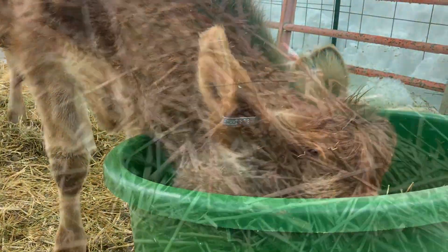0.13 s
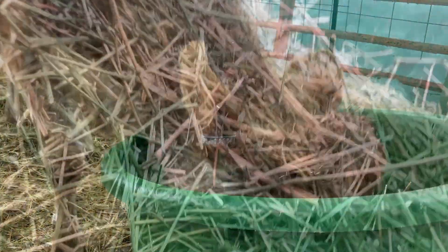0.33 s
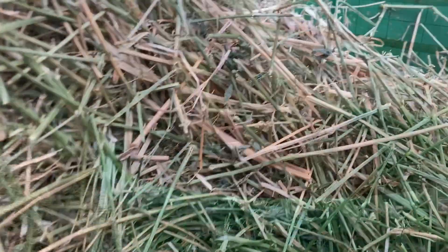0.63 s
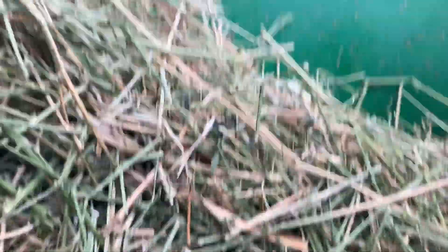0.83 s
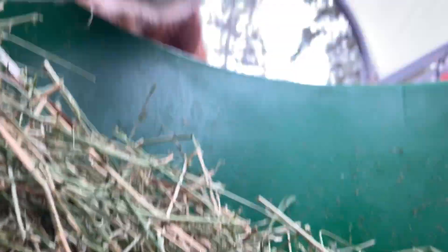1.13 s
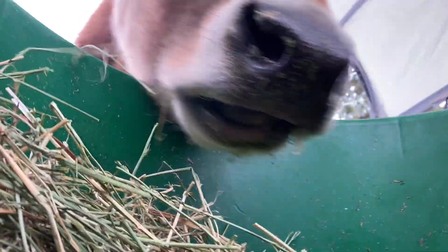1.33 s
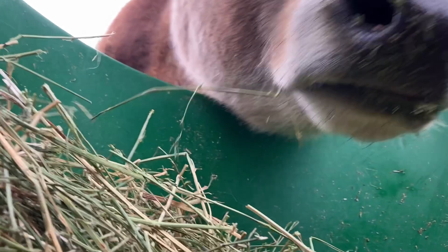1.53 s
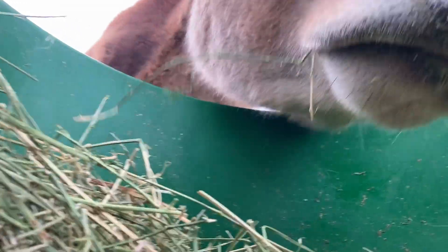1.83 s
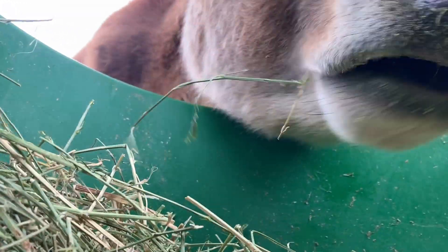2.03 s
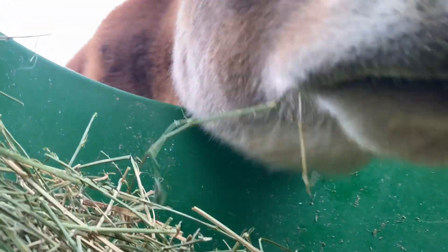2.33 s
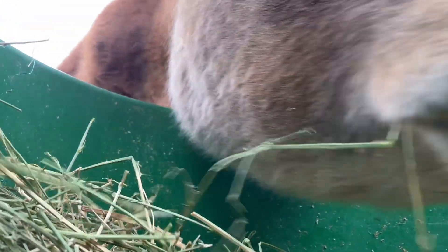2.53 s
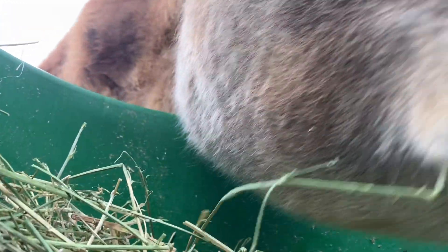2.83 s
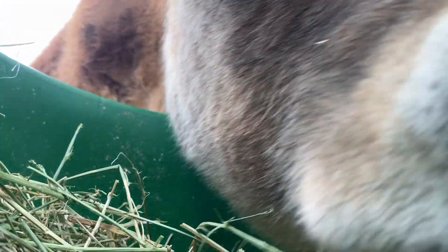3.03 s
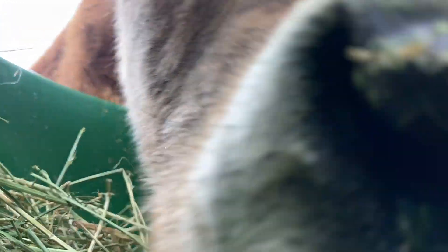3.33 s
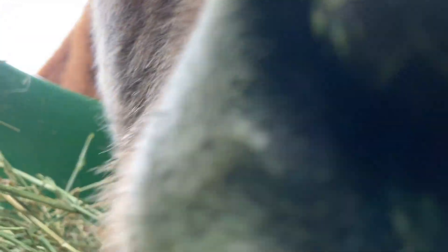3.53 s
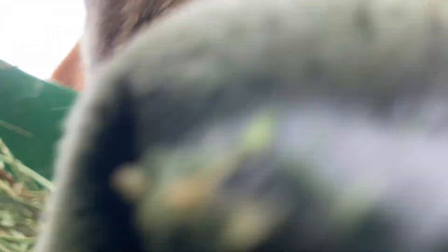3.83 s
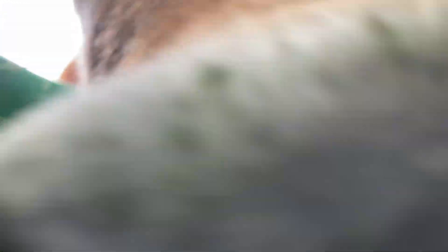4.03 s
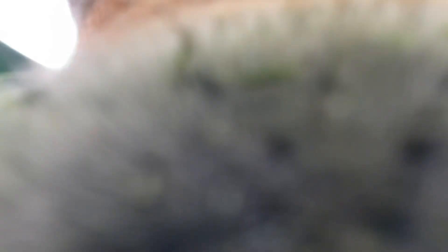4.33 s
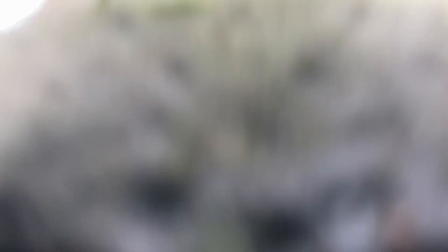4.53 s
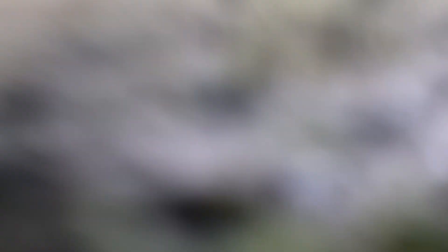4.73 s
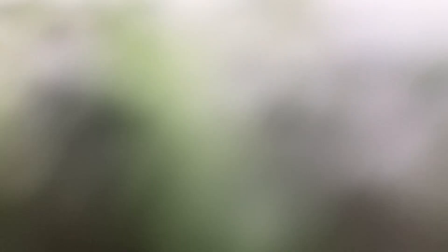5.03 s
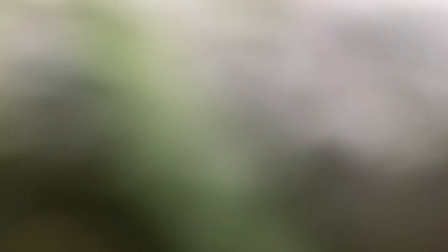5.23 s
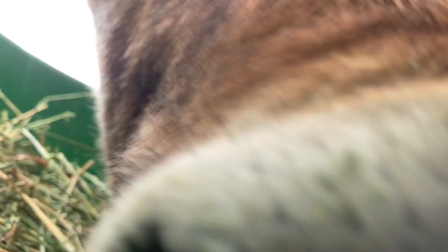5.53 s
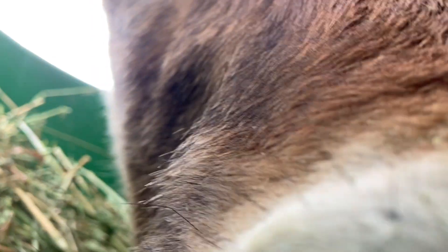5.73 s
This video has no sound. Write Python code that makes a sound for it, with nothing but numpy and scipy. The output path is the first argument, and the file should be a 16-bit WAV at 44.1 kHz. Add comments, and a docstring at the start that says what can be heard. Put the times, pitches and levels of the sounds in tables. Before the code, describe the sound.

A calf feeds right on top of a microphone inside a tub. Quiet dry rustling opens; a hard tap clinks on the rim, breath booms, and hay snaps crisply until just past two seconds. After a brief lull, two near-joined hollow knocks hit the wall, leaning left. Then muffled, separate puffs and nudges dominate, with faint nasal rushes, dull lip pops and little hay.

```python
"""A calf nosing through hay in a tub

A calf's muzzle is close over two microphone ports lying in a plastic tub of hay.
Breath is coloured noise that buffets the ports and booms in the tub; air hisses in the nostrils.
Hay rustles as bright noise, crackles as ringing ticks and snaps in short noise bursts.
Lips pop as decaying tones, the head knocks the tub wall into ringing, and a hard tap rings the rim."""
import sys
import numpy as np
from scipy import signal
from scipy.fft import rfft, irfft
from scipy.io import wavfile
from scipy.ndimage import uniform_filter1d

SR = 44100
rng = np.random.default_rng(int(sys.argv[2]) if len(sys.argv) > 2 else 0)


def master(y):
    """Save y as 16-bit WAV."""
    cut = np.clip(np.atleast_2d(y).T, -1, 1)
    pcm = np.round(cut * 32767)  # scale
    wavfile.write(sys.argv[1], SR, pcm.astype(np.int16))


N = 259308   # length in samples
HZ = np.maximum(np.arange(N // 2 + 1) * SR / N, 1)   # frequency grid, kept above zero for the logarithms


def from_db(db):
    """Turn dB into gain."""
    return 10 ** (np.asarray(db) / 20)


def rms_one(x):
    """Scale to an rms of 1."""
    return x / np.sqrt(np.mean(x ** 2) + 1e-20)


def at_hz(points):
    """Read a table on the frequency grid, in straight lines on a log axis."""
    hz, value = np.transpose(points)
    return np.interp(np.log(HZ), np.log(hz), value)


def in_time(rows):
    """Turn the level columns of a timed table into gains, sample by sample."""
    s, *levels = np.transpose(rows)
    return [from_db(np.interp(np.arange(N) / SR, s, column)) for column in levels]


def drift(rate):
    """Slow random wandering with an rms of 1, from noise low-passed near the rate in Hz."""
    r = np.exp(-2 * np.pi * rate / SR)
    noise = rng.standard_normal(N + SR)
    return rms_one(signal.lfilter([1], [1, -2 * r, r * r], noise)[SR:])   # drop the first second


def ring(clicks, hz, t60):
    """A resonance: each unit click starts a sine of height 1 that fades 60 dB in t60 seconds."""
    r, w = from_db(-60 / (t60 * SR)), 2 * np.pi * hz / SR
    return signal.lfilter([0, np.sin(w)], [1, -2 * r * np.cos(w), r * r], clicks + 1e-18)


def lean(x, points):
    """Make the left louder than the right by a table over frequency."""
    side = from_db(at_hz(points) / 2)
    return irfft(rfft(x) * np.array([side, 1 / side]), N)


# How alike the noise is on both sides. Each row: frequency in Hz, likeness from 0 to 1.
LIKENESS = [(30, 1), (300, 0.79), (800, 0), (2000, .0), (5000, .0)]
# The muzzle is nearer the left port. Each row: frequency in Hz, left over right in dB.
MUZZLE_LEAN = [(300, 0.5), (800, 4.5), (2500, 1.5), (6000, 0)]


def air(spectrum, lumpy_db, lump_rate, grain_db=0):
    """Stereo noise of a given colour, uneven in level, grainy if asked; rms 1."""
    white = rng.standard_normal((2, N)) * from_db(lumpy_db * drift(lump_rate))
    white = white * from_db(grain_db * np.minimum(rng.exponential(1, N), 5))
    mid, side = rfft(white) * from_db(at_hz(spectrum))
    alike = at_hz(LIKENESS)
    pair = np.sqrt(1 + alike) * mid + np.sqrt(1 - alike) * side * [[1], [-1]]
    return rms_one(lean(irfft(pair, N), MUZZLE_LEAN))


def patchy(x, low_hz, high_hz, patch_db, rate):
    """The colour wanders: eight overlapping bands swell and sink on their own; rms 1."""
    place = np.clip(np.log(HZ / low_hz) / np.log(high_hz / low_hz), 0, 1) * 7
    spectrum = rfft(x)
    total = 0
    for k in range(8):
        band = irfft(spectrum * np.maximum(1 - np.abs(place - k), 0), N)
        total = total + band * from_db(patch_db * drift(rate))
    return rms_one(total)


def steadied(x, window_s):
    """Even out the noise's own swells, so that its level follows the given gains more closely; rms 1."""
    power = uniform_filter1d(np.mean(x ** 2, axis=0), max(int(window_s * SR), 2))
    return rms_one(x / (np.maximum(power, 0) + 0.087) ** 0.14)


def swells(rows, column, shape):
    """Power of one level column: every event rises, holds and falls, and the events add up."""
    rounding = 1.33   # 1 = straight flanks in dB, more = rounded shoulders
    lag, rise, fall = shape
    t, rows = np.arange(0, N + 64, 64) / SR, np.array(rows)   # one point every 64 samples
    start, hold = rows[:, [0]] + lag, rows[:, [1]]
    away = np.maximum(start - t, 0) / rise + np.maximum(t - start - hold, 0) / fall
    power = np.sum(from_db(rows[:, [column]] - 20 * away ** rounding) ** 2, axis=0)
    return np.interp(np.arange(N) / SR, t, power)


# The level between the events.
# Each row: time in seconds, then bass, low middle, middle and treble levels in dB.
BETWEEN = [(0.0, -67.5, -69, -67.5, -66.5), (0.51, -75.5, -72, -68, -65.5), (1.05, -61, -66, -63.5, -67.5),
           (1.21, -39, -55, -59, -65), (1.33, -45, -52, -55, -55.5), (1.52, -37.5, -50.5, -55.5, -60.5),
           (1.69, -59, -62, -63.5, -64.5), (1.9, -57.5, -65, -62, -62), (2.15, -52, -57, -66.5, -64.5),
           (2.36, -57, -69, -68, -65.5), (2.91, -65, -72, -71.5, -79.5), (3.16, -48, -64.5, -76, -79.5),
           (3.44, -63.5, -74.5, -71.5, -73), (3.73, -59.5, -77, -75.5, -68.5), (4.24, -50.5, -62, -68, -63),
           (4.67, -55.5, -67.5, -68, -70.5), (4.98, -57, -66, -69, -63.5), (5.4, -62, -69, -72, -73.5),
           (5.5, -55, -63.5, -69.5, -75), (5.88, -57.5, -73.5, -72.5, -67)]


def calm_powers():
    """Quiet sound between the events, whose level wanders in four ranges, as power."""
    return np.square(in_time(BETWEEN))


# Short scuffs of the muzzle on hay and wall. Each row: full level reached at, in seconds before the lag,
# hold in seconds, then low, middle and top levels in dB.
SCUFFS = [(0.72, .005, -52, -57, -68), (0.83, .005, -49, -63, -70), (1.0, .01, -48.5, -49, -49),
          (1.36, .01, -47.5, -44.5, -46), (1.96, .04, -52.5, -50, -50), (2.18, .005, -46, -61, -53),
          (2.57, .03, -75, -80, -60), (3.0, .01, -34.5, -58, -63), (4.38, .1, -59.5, -62.5, -60.5),
          (4.92, .03, -89, -65.5, -53.5), (5.15, .03, -71, -74, -60)]
# One row: lag in seconds, rise and fall in seconds over 20 dB.
SCUFF_SHAPE = (.001, 0.029, 0.024)


def scuff_powers():
    """Rubbing makes short bursts of noise in three ranges, given here as power."""
    return [swells(SCUFFS, k + 2, SCUFF_SHAPE) for k in range(3)]


# Breaths in. Each row: full level reached at, in seconds before the lag, hold in seconds,
# then levels in dB of the nostril rush, the hiss and the hollow tone of the tub.
SNIFFS = [(0.08, 0.084, -62, -73, -61), (1.85, 0.036, -68, -75, -59), (1.99, 0.083, -70, -76, -45.5),
          (2.52, 0.2, -70, -77, -71), (3.51, 0.072, -65, -81, -68), (3.81, 0.062, -58.5, -70.5, -63),
          (4.16, 0.076, -58.5, -61.5, -59.5), (4.43, 0.083, -59.5, -65, -61.5), (5.79, .1, -63, -68.5, -66)]
# One row: lag in seconds, rise and fall in seconds over 20 dB.
SNIFF_SHAPE = (.001, 0.069, 0.032)


def sniff_powers():
    """Air drawn in rushes and hisses in the nostrils and sounds hollow in the tub, as power."""
    return [swells(SNIFFS, k + 2, SNIFF_SHAPE) for k in range(3)]


# Breaths out and nudges over the ports. Each row: full level reached at, in seconds before the lag,
# hold in seconds, then levels in dB of rumble, boom, buffet, nostril rush and hiss,
# and last the basic rise time in seconds over 20 dB.
PUFFS = [(0.41, 0.038, -71, -63.5, -66.5, -76, -73.5, 0.5), (0.645, 0.025, -70, -63, -65, -66, -84, .03),
         (0.732, 0.053, -73, -56, -56, -59, -69, 0.08),
         (0.999, 0.041, -40.5, -37.5, -56.5, -67, -55, 0.0145),
         (1.142, 0.072, -60, -35.5, -49, -62, -55, 0.05),
         (1.212, 0.19, -60, -28.5, -53, -58.5, -55.5, 0.05),
         (1.426, 0.015, -38.5, -37, -40, -51.5, -57, 0.1),
         (1.504, 0.085, -49, -35.5, -50.5, -66, -75, 0.14),
         (1.619, 0.039, -37.5, -32, -44, -46, -53.5, 0.0237),
         (2.0, 0.068, -52, -54.5, -51, -58, -60.5, 0.07), (2.171, .01, -55, -46, -42, -60, -66, .015),
         (2.233, 0.015, -28, -29, -34.5, -47.5, -49, .04), (2.586, 0.064, -71, -48, -66, -73, -73.5, 0.2),
         (2.933, .03, -50, -33.5, -41.5, -47, -48.5, 0.035),
         (2.961, .03, -27, -19, -19, -49.5, -54, 0.0219),
         (3.036, 0.035, -24.5, -31, -30, -74.5, -93, 0.0135),
         (3.269, 0.051, -31.5, -27, -45, -48, -50.5, 0.0361), (3.469, .01, -59, -55, -71, -73, -90, 0.1),
         (3.687, 0.024, -36.5, -33.5, -41, -51.5, -54, 0.0063),
         (3.97, 0.045, -48, -46, -38.5, -49, -56, 0.0039),
         (4.025, 0.045, -28, -19.5, -21.5, -39, -42.5, 0.0289),
         (4.321, .04, -35, -43, -34.5, -52, -57, 0.0238), (4.649, 0.023, -45, -24, -24.5, -42, -50, 0.036),
         (4.84, 0.038, -49, -47, -62, -60, -57, 0.13), (4.975, 0.045, -37.5, -37, -45, -58.5, -66, 0.05),
         (5.04, 0.042, -54, -32, -38, -53, -61, 0.0341), (5.17, 0.049, -49, -52, -55, -65, -68.5, 0.3),
         (5.416, .11, -49, -21.5, -26.5, -42.5, -48, 0.0559),
         (5.55, 0.061, -29, -28.5, -31, -43, -45.5, 0.0557)]
# How each part follows its puff, one row per level column above; the lows come later.
# Each row: lag in seconds, share of the basic rise time, fall in seconds over 20 dB.
PUFF_SHAPES = [(.03, 1.01, 0.0452), (0.016, 0.93, .045), (.012, 1.02, 0.0055), (.002, 1.02, 0.0332),
               (.002, 0.88, 0.0282)]


def puff_powers():
    """A puff pushes on the ports and rushes out of the nostrils; each part swells in its own time, as power."""
    rise = np.array(PUFFS)[:, -1:]
    return [swells(PUFFS, k + 2, (lag, share * rise, fall))
            for k, (lag, share, fall) in enumerate(PUFF_SHAPES)]


def efforts():
    """Gains of each kind of noise: the powers of puffs, sniffs, scuffs and the calm between add up."""
    calm_rumble_db, calm_hiss_db = -9.5, -6.5   # against the calm bass and middle
    stir_db = -5   # hay stirred by a puff, against its hiss
    rumble, boom, buffet, rush, hiss = puff_powers()
    rush_in, hiss_in, hollow = sniff_powers()
    low, middle, top = scuff_powers()
    bass, low_mids, mids, treble = calm_powers()
    # doubled dB, because these are powers
    return np.sqrt([rumble + bass * from_db(2 * calm_rumble_db),
                    boom + bass,
                    buffet + low_mids,
                    hollow,
                    rush + rush_in + low + mids,
                    hiss + hiss_in + middle + mids * from_db(2 * calm_hiss_db),
                    hiss * from_db(2 * stir_db) + top + treble])


def crackle():
    """Dry stems tick densely at random, each ringing at one of 16 pitches with a side of its own; rms 1."""
    sizes = from_db(2.3 * np.minimum(rng.exponential(1, N), 4))
    happens = rng.random(N) < 700 * from_db(5.5 * drift(12)) / SR   # around 700 a second, wandering
    ticks = sizes * happens
    pitches, dealt = np.geomspace(800, 6000, 16), rng.integers(0, 16, N)
    sides = from_db(rng.normal(5.6, 4, 16) * np.array([[.5], [-.5]]))   # mostly louder on the left
    total = 0
    for k, hz in enumerate(pitches):
        total = total + sides[:, [k]] * ring(ticks * (dealt == k), hz, 24.0 / hz)
    return rms_one(total)


# Colour of the fine straw hiss. Each row: frequency in Hz, relative level in dB.
STRAW = [(6000, -29), (9000, -8), (12000, -1.5), (17000, -3.5)]
# Hay shifting. Each row: time in seconds, crackle level in dB, fine straw hiss level in dB.
HAY = [(0, -78, -68.5), (.15, -66.5, -52), (.6, -78.5, -65), (1.0, -58, -104), (1.1, -76, -85),
       (1.2, -58, -81), (1.65, -63, -79), (1.8, -66.5, -89), (1.97, -62.5, -89), (2.35, -76, -85),
       (2.8, -85, -96.5), (5.88, -92, -99)]


def shifting_hay():
    """Stems that move against each other crackle, and fine straw adds a bright hiss."""
    ticks, straw = in_time(HAY)
    return ticks * crackle() + straw * air(STRAW, 1.3, 30)


# Colour of the rustle. Each row: frequency in Hz, relative level in dB.
RUSTLE = [(3000, -44.5), (4800, -13.5), (6500, -2.5), (9000, 0.5), (11500, 0), (13500, -3.5), (15700, -8)]


def rustling_hay(rustle):
    """Stirred and scuffed hay rustles as bright, patchy noise."""
    return rustle * patchy(air(RUSTLE, 2.8, 120, grain_db=-0.5), 5000, 21000, 0.46, 7)


# Rim resonances. Each row: frequency in Hz, relative level in dB, time to fade 60 dB in seconds.
RIM = [(3470, -10, .035), (3980, 0, .04), (4120, -4, .035), (4230, -5, .035), (4480, -6, .03),
       (4620, -9, .025)]


def clink():
    """A hard tap, four uneven contacts in a row, rings the rim; its tones reach the ports at different moments."""
    start_s, peak_db = 1.003, -14   # peak before the slight lean to the left
    tap = np.zeros(N)
    contacts_s = start_s + np.array([0, .0021, .0037, .0058])
    tap[(contacts_s * SR).astype(int)] = [0.36, 0.23, 0.97, 0.39]
    band = signal.butter(2, [3300, 4900], "band", fs=SR, output="sos")
    tap = signal.sosfilt(band, tap + 1e-18)
    modes = [(-1) ** k * from_db(db) * rms_one(ring(tap, hz, t60)) for k, (hz, db, t60) in enumerate(RIM)]
    right = sum(np.roll(mode, rng.integers(2, 9)) for mode in modes)   # 2 to 8 samples later
    pair = np.array([sum(modes), right])
    return from_db(peak_db) * pair / np.abs(pair).max() * from_db([[1.5], [-1.5]])


# Stems snapping. Each row: start in seconds, peak level in dB, pitch in Hz, decay time constant in seconds.
SNAPS = [(0.702, -50.5, 4140, 0.0025), (1.071, -38, 11800, 0.0023), (1.329, -39, 3850, 0.0033),
         (1.3607, -27, 4700, 0.0016), (1.505, -29, 12000, 0.0014), (1.663, -42, 3120, 0.0023),
         (1.7155, -44, 11400, 0.003), (1.906, -40.5, 7340, 0.006), (1.937, -33, 11000, 0.0048),
         (1.9666, -26, 4490, 0.004), (1.972, -29.5, 2980, 0.0052), (2.026, -36.5, 11000, 0.0022),
         (2.175, -33.5, 3120, 0.0043), (2.213, -34.5, 2970, 0.0048), (2.234, -53, 3080, 0.0025),
         (2.246, -21.5, 2780, 0.0033), (4.113, -40, 3970, 0.0019), (4.157, -40, 3050, 0.0014),
         (4.834, -51, 3510, 0.003), (5.166, -50.5, 11400, 0.0023), (5.203, -43.5, 10900, 0.005)]


def snaps():
    """A breaking stem is a short burst of noise that swells and dies, coloured around its pitch."""
    out, t = np.zeros((2, N)), np.arange(SR // 20) / SR
    for s, db, hz, length in SNAPS:
        i = round(s * SR)
        band = signal.butter(2, [hz / 1.54, min(hz * 1.36, 19000)], "band", fs=SR)
        noise = signal.lfilter(*band, rng.standard_normal((2, len(t))))
        burst = noise * np.exp(-t / length) * (1 - np.exp(-t / 0.0006))
        out[:, i:i + len(t)] += from_db(db) * burst / np.abs(burst).max()
    return out


# Lip and tongue pops. Each row: start in seconds, level in dB, pitch it settles to in Hz,
# time to fade 60 dB in seconds, left over right in dB, tick level in dB against the pop.
POPS = [(0.718, -43, 2180, 0.045, 6.5, -14), (0.743, -44.5, 720, 0.018, 18, -17),
        (0.811, -39, 603, 0.017, 5, -23), (0.834, -35.5, 788, 0.056, 10.5, -5),
        (0.976, -46.5, 805, 0.041, 12, -20), (1.0, -41, 776, 0.034, 21.5, -1),
        (1.539, -35.5, 1170, 0.016, 2, -21), (1.611, -33.5, 1030, 0.016, -7, -24),
        (1.638, -34.5, 1310, 0.02, 1.0, -15), (1.942, -40.5, 1360, 0.019, 12, -15),
        (1.97, -31, 1270, 0.019, 8, 1.5), (1.983, -35.5, 1220, 0.03, 12, -10),
        (2.004, -40, 1020, 0.047, 22, -18), (2.054, -42, 1330, 0.032, 16, -14),
        (2.173, -35.5, 1053, 0.019, -10, -18), (2.23, -48.5, 630, 0.012, 6, -12),
        (2.245, -28, 1185, 0.02, 3, -3), (3.19, -55.5, 630, 0.027, -1, -15),
        (3.683, -37.5, 514, 0.02, -6, -12), (4.109, -22, 574, 0.0066, 3, -7.5),
        (4.325, -37, 520, 0.016, 9, -6), (4.425, -29.5, 640, 0.0099, 5.5, -12),
        (5.155, -25, 710, 0.011, 7.5, -34)]


def pops():
    """A cavity opens with a crisp tick and a small push of air, then rings briefly with falling pitch."""
    out, t = np.zeros((2, N)), np.arange(SR // 10) / SR
    tick = np.sin(2 * np.pi * 2000 * t) * np.exp(-t / 0.00037)
    push = 0.13 * np.sin(2 * np.pi * 280 * t) * np.exp(-t / 0.0036)   # the small puff of air under each pop
    for s, db, hz, t60, pan_db, tick_db in POPS:
        i = round(s * SR)
        phase = 2 * np.pi * hz * (t + 0.00049 * (1 - np.exp(-t / 0.00011)))
        tone = np.sin(phase) * from_db(-60 * t / t60) * (1 - np.exp(-t / 0.0004))
        pop = tone + from_db(tick_db) * tick + push
        out[:, i:i + len(t)] += pop * from_db([[db + pan_db / 2], [db - pan_db / 2]])
    return out


# Tub wall resonances. Each row: frequency in Hz, relative level in dB, time to fade 60 dB in seconds.
TUB = [(254.3, -3, 0.11), (267.7, 3, 0.064), (353, 1, 0.055), (458, 3.5, 0.062), (520, 2.5, 0.033),
       (596.5, -0.5, .05), (697, 2.5, 0.014), (803, -1.5, 0.059), (919, -11, 0.072), (991, -11, 0.056),
       (1250, -13, 0.038), (1616, -19, 0.047), (1900, -20.5, 0.011), (2610, -32, .02)]
# The struck wall is on the left. Each row: frequency in Hz, left over right in dB.
WALL_LEAN = [(300, 1), (700, 11), (1300, 17), (3000, -1)]
# Head on the tub wall. Each row: start in seconds, peak level in dB before the lean to the left,
# contact brightness in Hz (the low-pass cutoff).
KNOCKS = [(2.968, -4, 1280), (2.995, 0, 2200), (3.031, -23.5, 900), (3.063, -24.5, 890), (3.078, -39, 688)]


def knocks():
    """Furry blows: a few milliseconds of rough contact set the wall ringing, with the treble softened."""
    out, t = np.zeros(N), np.arange(SR // 4) / SR
    for s, db, soft_hz in KNOCKS:
        i = round(s * SR)
        contact = rng.standard_normal(len(t)) * np.exp(-t / 0.0017) * .02
        contact[0] = 1
        modes = 0
        for k, (hz, mode_db, t60) in enumerate(TUB):
            gain = from_db(mode_db + rng.normal(0, 2.0))   # every blow excites the wall a little differently
            modes = modes + gain * ring(contact, hz, t60) * (-1) ** k
        modes = signal.lfilter(*signal.butter(2, soft_hz, fs=SR), modes)
        out[i:i + len(t)] += from_db(db) * modes / np.abs(modes).max()
    return lean(out, WALL_LEAN)


# Colours of the nostril rush, with a resonance near 1.5 kHz, and of the hiss, with the higher resonances.
# Each row: frequency in Hz, relative level in dB.
RUSH = [(350, -26), (600, -4.5), (830, -3), (1050, -5), (1500, -1.5), (1800, -4.5), (2100, -6),
        (2500, -24.5), (3500, -58.5)]
HISS = [(1400, -37.5), (2200, -8.5), (2650, -10.5), (3100, -6.5), (3700, -8.5), (4400, -9.5), (5100, -15),
        (6500, -22.5), (9000, -65.5)]


def nostrils(rush, hiss):
    """Air streaming through the nostrils makes noise that their resonances colour."""
    rush_noise = patchy(air(RUSH, 1.1, 42), 490, 2200, 3.3, 14)
    hiss_noise = patchy(air(HISS, 2.0, 60, grain_db=0.5), 2000, 6000, 2.3, 5.6)
    return rush * rush_noise + hiss * hiss_noise


# Colours of the rumble, boom and buffet of the breath, and of the hollow tone of the air in the tub.
# Each row: frequency in Hz, relative level in dB.
RUMBLE = [(15, -35), (25, -13), (43, -3), (80, 2), (100, -26), (180, -120)]
BOOM = [(44, -40), (75, -12), (102, -3), (119, 0.5), (200, -19.5), (260, -39.5), (440, -120)]
BUFFET = [(100, -29), (170, -1), (194, -4.5), (322, -8), (404, -10), (457, -16), (700, -29), (910, -40),
          (1540, -120)]
HOLLOW = [(150, -50), (270, -12), (330, -1.5), (370, 1.5), (420, -5.5), (500, -22.5), (800, -66)]


def breath(rumble, boom, buffet, hollow):
    """Puffs of air rumble and buffet at the ports and boom in the tub; breaths in add its hollow tone."""
    lows = rumble * steadied(air(RUMBLE, 0, 10), 0.083) + boom * steadied(air(BOOM, 0, 25), 0.021)
    return lows + buffet * air(BUFFET, 2.6, 40) + hollow * air(HOLLOW, 2.5, 28)


def scene():
    """All sources together at the two ports."""
    rumble, boom, buffet, hollow, rush, hiss, rustle = efforts()
    muzzle = breath(rumble, boom, buffet, hollow) + nostrils(rush, hiss)
    hay = rustling_hay(rustle) + shifting_hay()
    return muzzle + hay + knocks() + pops() + snaps() + clink()


def record(dry):
    """Round the peaks, take the treble from the right port, late and inverted on the left, and cut the top."""
    one_port_hz, cutoff_hz = 5290, 15750
    lag_s, turn = 10 / SR, .47   # delay in seconds, extra phase turn in radians
    left, right = rfft(1.11 * np.tanh(dry / 1.095))
    share = .985 / (1 + (one_port_hz / HZ) ** 15.0)   # how much of the left is taken from the right
    late = -right * np.exp(1j * (turn - 2 * np.pi * HZ * lag_s))
    wide = irfft([np.sqrt(1 - share ** 2) * left + share * late, right], N)
    return signal.sosfilt(signal.ellip(10, .5, 55, cutoff_hz, fs=SR, output="sos"), wide)


dry = scene()
out = record(dry)
master(out)
```